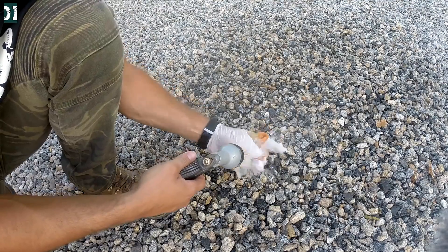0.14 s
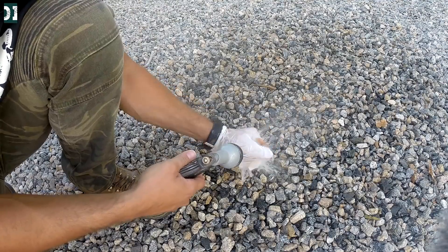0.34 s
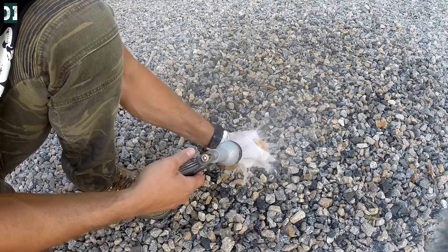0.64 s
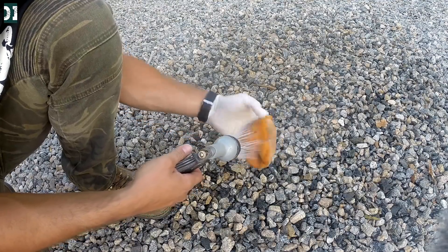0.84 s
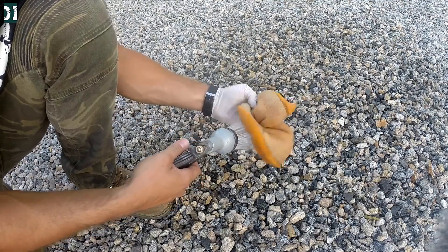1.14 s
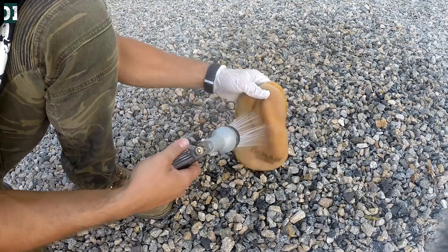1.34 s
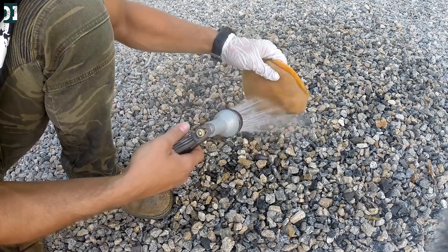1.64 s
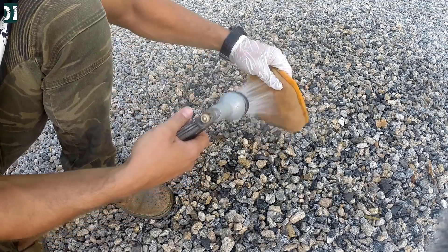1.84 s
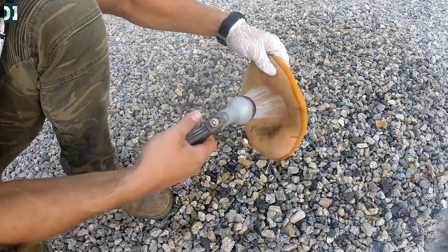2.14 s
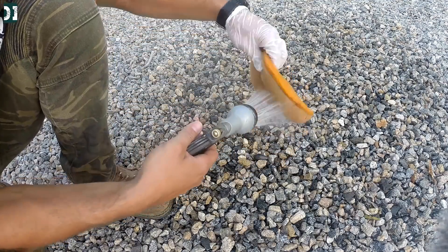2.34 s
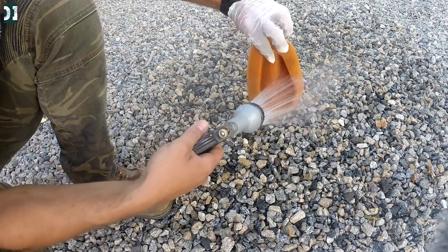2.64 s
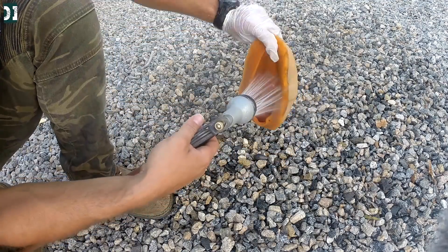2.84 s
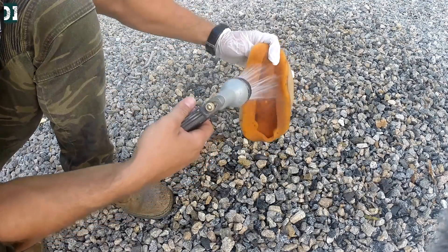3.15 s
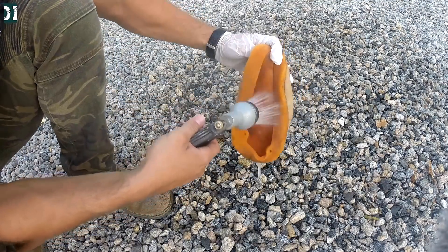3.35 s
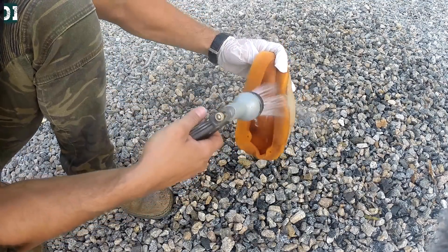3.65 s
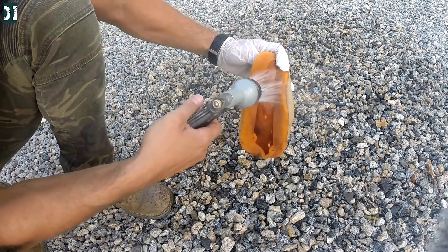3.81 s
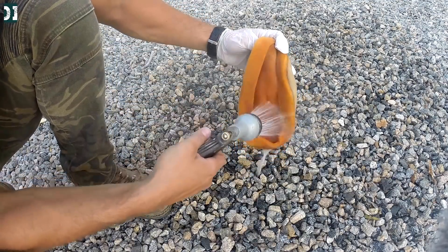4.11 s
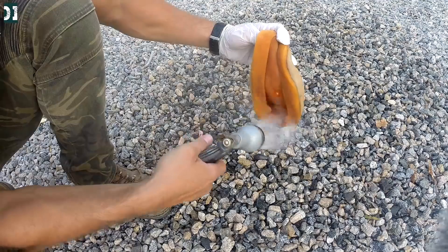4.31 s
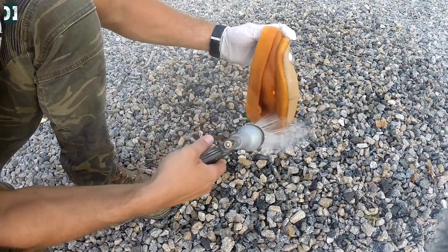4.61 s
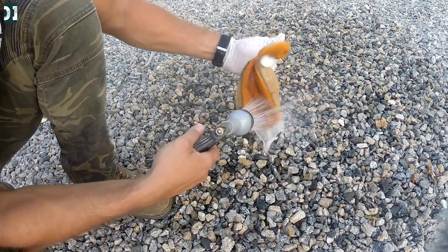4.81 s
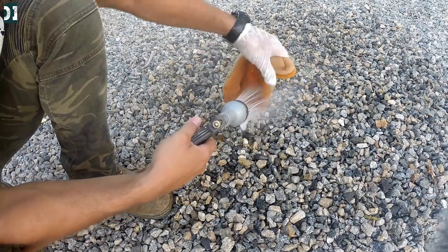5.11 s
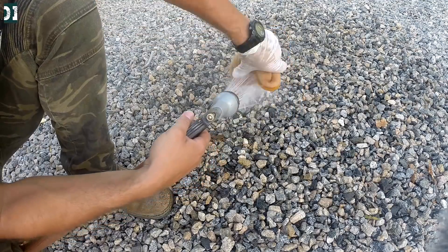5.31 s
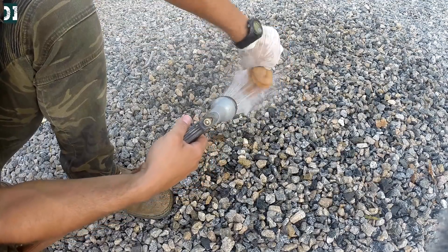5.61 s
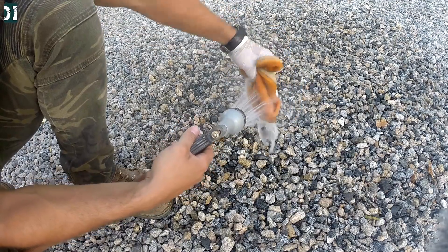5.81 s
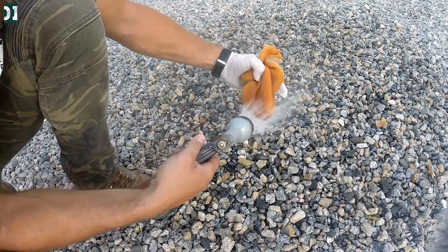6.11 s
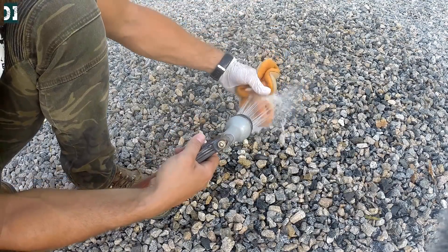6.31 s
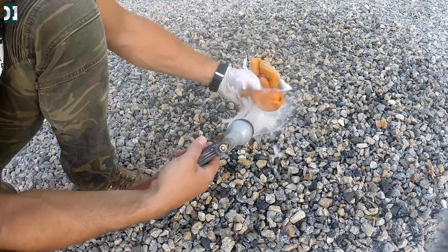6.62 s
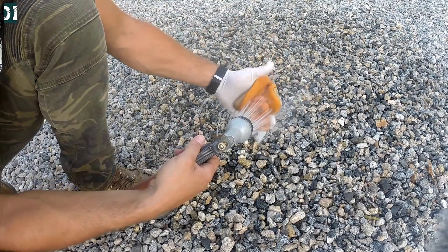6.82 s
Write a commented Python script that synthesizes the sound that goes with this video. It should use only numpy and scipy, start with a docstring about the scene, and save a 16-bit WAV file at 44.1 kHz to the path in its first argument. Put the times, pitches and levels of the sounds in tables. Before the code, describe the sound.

A garden hose sprays a steady, fizzing hiss of water onto a foam filter, with shifting hollow tones and small sputters.

```python
"""A garden hose sprays a foam filter that a gloved hand turns and squeezes above gravel; close, near mono.
From the start, thousands of drops a second fizz on the foam and ring two moving resonances, the filter's
hollow and its bubbly film, while trapped air sputters out. From 1.8 s a few fat drops tick. A light breeze
rumbles at 2.5 s, the jets drum deep in the sleeve at 3.3-4.2 s, and the breeze puffs again near 5.5 s.
Toward the end the filter is wrung out and more run-off patters on the stones."""
import sys
import numpy as np
from scipy import signal
from scipy.fft import rfft, irfft, next_fast_len
from scipy.io import wavfile
from scipy.ndimage import uniform_filter1d, map_coordinates

SR = 44100
rng = np.random.default_rng(int(sys.argv[2]) if len(sys.argv) > 2 else 0)


def persist_wave(psi):
    """Save psi, clipped to +-1, as 16-bit WAV."""
    counts = np.round(np.clip(psi, -1, 1) * 32767).astype(np.int16)
    wavfile.write(sys.argv[1], SR, np.atleast_2d(counts).T)


N = 306936


def amp(db):
    return 10 ** (np.asarray(db) / 20)


def unit(x):
    return x / np.sqrt(np.mean(x ** 2) + 1e-20)


def curves(rows):
    """One value per sample for each column after the time."""
    time_s, *columns = np.transpose(rows)
    return [np.interp(np.arange(N) / SR, time_s, column) for column in columns]


def wobble(rate_hz):
    """Smooth random curve, rate_hz knots a second."""
    knots = rng.standard_normal(int(N * rate_hz / SR) + 4)
    return map_coordinates(knots, [np.arange(N) * rate_hz / SR])


def gate(start_s, length_s, attack_s, release_s):
    """Trapezoid with its ramps centred on the two ends."""
    t = np.arange(N) / SR - start_s
    return np.clip(.5 + t / attack_s, 0, 1) * np.clip(.5 + (length_s - t) / release_s, 0, 1)


def swells(rows, attack_s, release_s):
    """Summed gain of (start [s], length [s], level [dB]) events."""
    return sum(amp(db) * gate(start_s, length_s, attack_s, release_s) for start_s, length_s, db in rows)


def filtered(x, response):
    """x through a gain given as a function of frequency."""
    size = next_fast_len(N + SR // 2)
    return irfft(rfft(x, size) * response(np.fft.rfftfreq(size, 1 / SR)), size)[..., :N]


def coloured(x, spectrum):
    """x shaped by (frequency [Hz], gain [dB]) points; rms 1."""
    points_hz, db = np.transpose(spectrum)
    return unit(filtered(x, lambda hz: amp(np.interp(np.log(hz + 1), np.log(points_hz), db))))


def patchy(x, depth_db, hz_bins, frames):
    """Shifting folds and water sheets favour changing patches of frequency; rms 1."""
    spectra = signal.stft(x, nperseg=512)[2]
    field = rng.standard_normal(spectra.shape)
    for axis, span in enumerate([hz_bins, frames]):
        field = uniform_filter1d(field, span, axis)
    return unit(signal.istft(spectra * amp(depth_db * unit(field)), nperseg=512)[1][:N])


def resonate(x, centre_hz, width, skirt_hz):
    """Moving resonance of constant power; width is relative, treble fades above skirt_hz."""
    hz, t, spectra = signal.stft(unit(x), SR, nperseg=512, noverlap=384)
    per_frame = lambda curve: np.interp(t, np.arange(N) / SR, np.broadcast_to(curve, N))
    ratio = (hz[:, None] + 1) / per_frame(centre_hz)
    gain = 1 / np.hypot(np.maximum(per_frame(width), .08), ratio - 1 / ratio)
    gain /= np.sqrt(1 + (0.63 / ratio) ** 13)  # a small cavity radiates little below its pitch
    gain /= np.sqrt(1 + (hz[:, None] / skirt_hz) ** 6)
    gain /= np.sqrt(np.mean(gain ** 2, axis=0))
    return signal.istft(spectra * gain, SR, nperseg=512, noverlap=384)[1][:N]


def drops(per_s, spread_db):
    """Random impacts of unequal size, each a tiny puff of noise; rms 1."""
    lands = rng.random(N) < per_s / SR
    energy = lands * amp(spread_db * np.clip(rng.standard_normal(N), -2, 2)) ** 2
    decay = amp(-60 * np.arange(SR // 500) / SR / 0.0012)
    puffs = np.convolve(energy, decay)[:N]
    return unit(np.sqrt(puffs) * rng.standard_normal(N))


def outdoor_air():
    """Puffs of breeze over a distant rumble, almost alike in both channels."""
    # puffs (start [s], length [s], level [dB])
    gusts = [(2.52, .21, -40.5), (2.75, .85, -56.5), (3.9, 0.17, -48), (5.17, 1.11, -53),
             (5.45, 0.29, -46.5), (6.66, .3, -58)]
    # spectra (frequency [Hz], gain [dB])
    breeze_spectrum = [(10, -1.5), (25, 3.5), (45, -5), (80, -14.5), (140, -18.5), (250, -35.5), (600, -53)]
    distant_spectrum = [(15, -4), (35, 2.5), (70, 6), (150, 0.5), (230, -6), (600, -30)]
    side_spectrum = [(25, -1.5), (60, -7), (130, -11), (300, -19.5), (500, -23), (900, -55)]
    wind = amp(-62.5 + 2.2 * wobble(3.95)) + swells(gusts, attack_s=0.089, release_s=0.15)
    breeze = wind * coloured(rng.standard_normal(N), breeze_spectrum)
    distant = amp(-59.5) * coloured(rng.standard_normal(N), distant_spectrum)
    side = amp(-73) * coloured(rng.standard_normal(N), side_spectrum)
    return breeze + distant + np.array([side, -side])


def gravel():
    """Run-off patters on the stones, more as the filter is wrung out; stray drops tick."""
    # run-off (time [s], level [dB])
    flow = [(0, -60.5), (5.3, -59.5), (5.9, -55.5), (6.6, -54), (6.96, -58.5)]
    # spectra (frequency [Hz], gain [dB])
    runoff_spectrum = [(60, -8), (160, -3.5), (260, -2), (420, -2), (600, -3), (900, -2), (2000, -19),
                       (6000, -47)]
    stone_spectrum = [(1500, -20), (4000, 3), (8000, 1), (10500, -14), (14000, 3)]
    runoff = amp(curves(flow)[0]) * coloured(drops(per_s=5000, spread_db=4.5), runoff_spectrum)
    strays = amp(-50.5) * coloured(drops(per_s=60, spread_db=1), stone_spectrum)
    return runoff + strays


def ticks():
    """A fat drop gives a sharp crack and a very short ring."""
    # (time [s], level [dB], pitch [Hz])
    fat_drops = [(1.821, -24, 3200), (2.019, -19, 3630), (2.766, -41, 7900), (4.436, -30, 2200),
                 (5.005, -20, 3500), (5.203, -37, 1600), (6.862, -21, 2400)]
    ring_t60_s, crack_t60_s = 0.0072, 0.0056
    out, t = np.zeros(N + SR), np.arange(SR // 20) / SR
    for time_s, db, hz in fat_drops:
        ring = np.sin(2 * np.pi * hz * t) * (1 - np.exp(-2 * hz * t)) * amp(-60 * t / ring_t60_s)
        crack = 0.89 * np.gradient(rng.standard_normal(len(t))) * amp(-60 * t / crack_t60_s)
        out[round(time_s * SR):][:len(t)] += amp(db) * (ring + crack)
    return out[:N]


def spurts():
    """Trapped air leaves the foam in short bursts of bubbles of about one size."""
    # (start [s], level [dB], pitch [Hz], length [s])
    air_pockets = [(0.119, -35, 2850, .1), (0.388, -37, 2780, 0.1), (0.641, -37, 3030, 0.062),
                   (.73, -34, 3600, 0.065), (1.052, -38.5, 3120, 0.06), (1.23, -41, 1770, 0.037),
                   (1.294, -45, 2420, 0.02), (1.529, -42, 3040, 0.064), (1.619, -38, 2110, .095),
                   (1.794, -48, 3300, 0.062), (2.285, -37, 1300, 0.075), (2.336, -34.5, 2300, .06),
                   (2.541, -42.5, 2450, 0.059), (2.846, -38.5, 2620, .09), (2.979, -41, 1220, 0.063),
                   (3.069, -40.5, 2480, 0.066), (3.293, -40, 2700, .06), (3.608, -32.5, 2920, 0.063),
                   (4.15, -38.5, 2200, .05), (4.238, -37, 2060, .04), (4.366, -40, 3350, 0.036),
                   (4.422, -33, 2050, 0.016), (4.45, -33.5, 1860, .011), (4.544, -34.5, 1380, .045),
                   (4.773, -35.5, 1330, 0.046), (5.122, -37, 1560, .055), (5.27, -39, 2330, 0.042),
                   (5.405, -34, 2950, 0.072), (5.561, -42.5, 2900, 0.047), (5.617, -38.5, 2170, .05),
                   (6.437, -39, 1860, .05), (6.564, -35, 3000, .08), (6.73, -41, 2800, 0.047),
                   (6.868, -41, 2800, 0.071)]
    band_ratio = 1.21
    out = np.zeros(N + SR)
    for start_s, db, hz, length_s in air_pockets:
        count = round(length_s * SR)
        b, a = signal.butter(2, [hz / band_ratio, hz * band_ratio], "bandpass", fs=SR)
        burst = unit(signal.lfilter(b, a, rng.standard_normal(count)))
        out[round(start_s * SR):][:count] += amp(db) * burst * signal.windows.tukey(count)
    return out[:N]


def drum(impacts):
    """The jets drum deep inside the sleeve."""
    # (start [s], length [s], level [dB])
    plunges = [(0.0, 0.33, -54.5), (2.15, 0.35, -54), (3.3, 0.31, -46), (3.62, 0.54, -44), (6.2, 0.42, -56),
               (6.76, 0.18, -54)]
    # (frequency [Hz], gain [dB])
    sleeve_spectrum = [(450, -38), (600, -15.5), (720, -8), (830, 0), (950, -2.5), (1150, -14.5),
                       (2000, -66)]
    gain = swells(plunges, attack_s=.08, release_s=0.044)
    return gain * coloured(impacts(big_share=0.17), sleeve_spectrum)


def hollow(impacts, gurgle, slip_db):
    """The filter's hollow rings in two modes when the jets find its mouth."""
    # excitation (time [s], level [dB])
    drive = [(0, -42.5), (.25, -39.5), (1.05, -49), (1.23, -39), (1.33, -51), (1.68, -46), (2.03, -51),
             (2.14, -40), (2.32, -34.5), (2.55, -48.5), (2.8, -51), (2.98, -42), (3.4, -40.5),
             (4.28, -38.5), (4.48, -47.5), (4.78, -38), (5.03, -38.5), (5.18, -35), (5.35, -38),
             (5.47, -50), (5.72, -51), (5.8, -41.5), (6.35, -43), (6.55, -34.5), (6.7, -42.5), (6.96, -39)]
    # deeper when hanging open, sharper when grazed (time [s], resonance [Hz], width [ratio])
    tuning = [(0, 1500, 0.58), (.45, 1810, .3), (1.3, 1830, 0.42), (1.75, 1440, 0.42), (2.15, 1520, .25),
              (2.35, 1350, 0.3), (3.0, 1210, 0.28), (3.35, 1410, 0.53), (4.0, 1420, 0.27),
              (4.25, 1310, 0.4), (4.8, 1275, .18), (5.18, 1440, 0.4), (5.35, 1280, 0.43), (5.8, 1330, 0.28),
              (6.13, 1540, 0.39), (6.55, 1470, .55), (6.96, 1750, .55)]
    drive_db, = curves(drive)
    hz, width = curves(tuning)
    flutter = amp(0.78 * wobble(18) + 1.5 * wobble(140))  # the soft wall flaps under the jets
    hz *= np.exp(0.033 * wobble(12))  # and bends the pitch
    first = resonate(flutter * impacts(big_share=0.2), hz, width, skirt_hz=2300)
    second = resonate(gurgle * impacts(big_share=0.14), 1.58 * hz, width=.18, skirt_hz=3000)
    return amp(drive_db - .5 - 1.7 * slip_db) * (first + amp(-10) * second)


def bubbles(centre_hz, per_s, scatter, cycles, spread_db):
    """Tiny bubbles ring near centre_hz, rising a little as they surface; rms 1."""
    start = rng.integers(0, N, int(per_s * N / SR))
    pitch, size = np.clip(rng.standard_normal((len(start), 2)), -2, 2).T[..., None]
    age = np.arange(SR // 100)
    turns = centre_hz[start, None] * np.exp(scatter * pitch) * age / SR
    life = turns / cycles
    envelope = amp(spread_db * size - 60 * life) * (1 - np.exp(-turns))
    rings = envelope * np.sin(2 * np.pi * turns * (1 + 0.1 * life))
    return unit(np.bincount((start[:, None] + age).ravel(), rings.ravel(), N)[:N])


def film(impacts, gurgle, force_db):
    """The bubbly water film on foam and glove resonates and pops."""
    # (time [s], resonance [Hz], extra level [dB], width [ratio])
    film_resonance = [(0, 3120, 0, 0.59), (.28, 2600, 1, 0.54), (.53, 3320, -0.5, 0.24),
                      (.76, 3300, 3, 0.22), (.87, 2440, -1, 0.56), (1.05, 3300, -3.5, .3),
                      (1.42, 3060, 0.5, 0.78), (1.68, 2420, -2.5, 0.7), (1.92, 3270, -3, .35),
                      (2.02, 3520, 3.5, 0.49), (2.13, 2420, 2.5, .6), (2.38, 2500, 0, 0.59),
                      (2.7, 2730, -5, 0.38), (3.0, 2590, 3.5, 0.23), (3.35, 2580, 2.5, 0.83),
                      (3.56, 2300, -2.5, 0.4), (3.86, 2880, 2.5, 0.76), (4.15, 2300, -6, .3),
                      (4.35, 2220, 2.5, 0.31), (4.85, 2350, 1.5, 0.36), (5.15, 2420, -10, 0.28),
                      (5.42, 3130, 0.5, 1), (5.65, 2520, 0, 0.7), (6.3, 2620, -7, 0.23),
                      (6.7, 2850, -2.5, 0.28), (6.96, 2620, 1.5, 0.82)]
    hz, wet_db, width = curves(film_resonance)
    churn = patchy(gurgle * impacts(big_share=0.18), depth_db=2.24, hz_bins=3, frames=2)
    froth = resonate(churn, hz, width, skirt_hz=4950)
    pops = bubbles(hz, per_s=500, scatter=0.183, cycles=17, spread_db=0.5)
    return amp(-40.5 + 1.2 * force_db + wet_db) * (froth + 0.32 * pops)


def splash(impacts, force_db):
    """Bright splashing, hardest when the jets catch an edge of the filter or glove."""
    # edge hits (start [s], length [s], level [dB])
    glances = [(.28, 0.73, -41.5), (.98, 0.062, -42), (1.975, 0.086, -34.5), (2.13, .1, -40),
               (3.28, 0.12, -38.5), (3.62, 0.055, -35), (3.88, 0.27, -47), (5.335, 0.097, -31),
               (6.44, 0.037, -35.5), (6.58, 0.1, -41), (6.85, 0.063, -37.5)]
    # (frequency [Hz], gain [dB])
    splash_spectrum = [(1200, -33), (3000, -8), (4300, 4), (5500, 3.5), (6600, 1), (8500, 4.5),
                       (12000, -27)]
    hardness = np.hypot(amp(-50 + 1.52 * force_db), swells(glances, attack_s=.08, release_s=0.025))
    return hardness * coloured(impacts(big_share=0.26), splash_spectrum)


def fizz(impacts, force_db):
    """Fine drops fizz on the foam."""
    # (frequency [Hz], gain [dB])
    fizz_spectrum = [(300, -32), (900, -8), (1500, -6), (2500, -5.5), (5000, -5), (6500, -5.5), (7400, 0.5),
                     (8600, 1.5), (9500, -3.5), (10600, -5.5), (12200, -1), (13600, -0.5), (14600, -2.5),
                     (15400, -4)]
    mist = patchy(impacts(big_share=0.3), depth_db=1.0, hz_bins=10, frames=3)
    return amp(-36.5 + force_db) * coloured(mist, fizz_spectrum)


def spray():
    """The jets break into clumps of drops; harder landings raise fizz, splash and film."""
    # how hard the jets land (time [s], level [dB])
    force = [(0, -35), (.19, -30.5), (.8, -34), (.9, -36.5), (1.5, -37.5), (1.68, -36.5), (1.94, -41.5),
             (2.02, -33), (2.27, -34), (2.35, -30.5), (2.43, -39.5), (3.2, -39.5), (3.39, -33), (3.54, -35),
             (3.66, -32.5), (3.8, -35), (4.12, -32), (4.32, -38.5), (5.26, -39.5), (5.39, -32),
             (5.49, -40.5), (6.0, -36.5), (6.3, -36), (6.6, -32), (6.73, -36), (6.96, -35)]
    # the jets slip past the foam (start [s], length [s], loss [dB])
    slips = [(0.905, 0.065, 1), (1.467, 0.044, 2), (1.58, 0.024, 2.5), (2.42, 0.06, 1), (2.616, 0.23, 3.5),
             (2.723, .05, 3.5), (3.13, 0.084, 1), (5.49, .07, 2.5), (6.5, 0.055, 2)]
    usual_db, edge_s = -37, 0.024
    slip_db = sum(db * gate(start_s, length_s, edge_s, edge_s) for start_s, length_s, db in slips)
    force_db = curves(force)[0] - usual_db - slip_db
    sway_db = .4 * wobble(12)  # hand-held nozzle
    clumps = amp(sway_db + 0.41 * wobble(45) + 0.51 * wobble(260))
    big = drops(per_s=500, spread_db=2.5)  # larger drops strike all layers at once

    def impacts(big_share):
        return clumps * (big_share * big + drops(per_s=14000, spread_db=1.5))

    hiss = fizz(impacts, force_db) + splash(impacts, force_db)
    gurgle = amp(1.4 * wobble(26) + 0.79 * wobble(55))  # bubbles gather and burst in the film
    return hiss + film(impacts, gurgle, force_db) + hollow(impacts, gurgle, slip_db) + drum(impacts)


def scene():
    return spray() + spurts() + ticks() + gravel() + outdoor_air()


def record(dry):
    """Brick-wall low-pass."""
    return filtered(dry, lambda hz: hz < 15450)


dry = scene()
out = record(dry)
persist_wave(out)
```